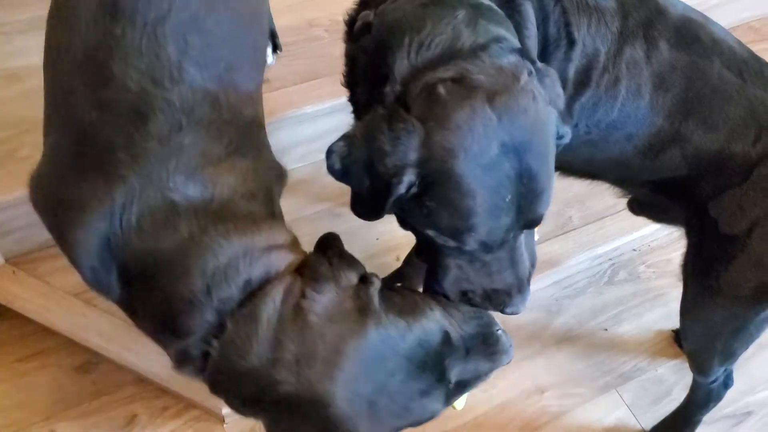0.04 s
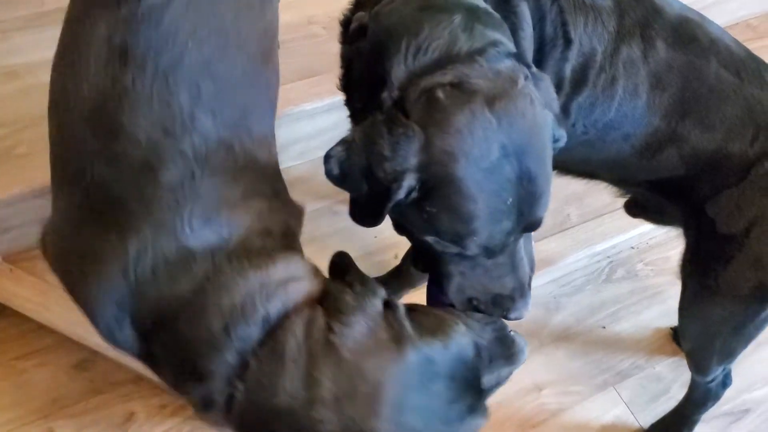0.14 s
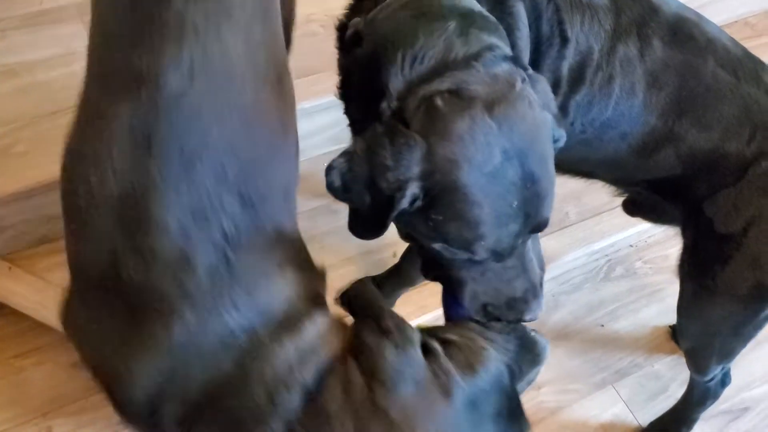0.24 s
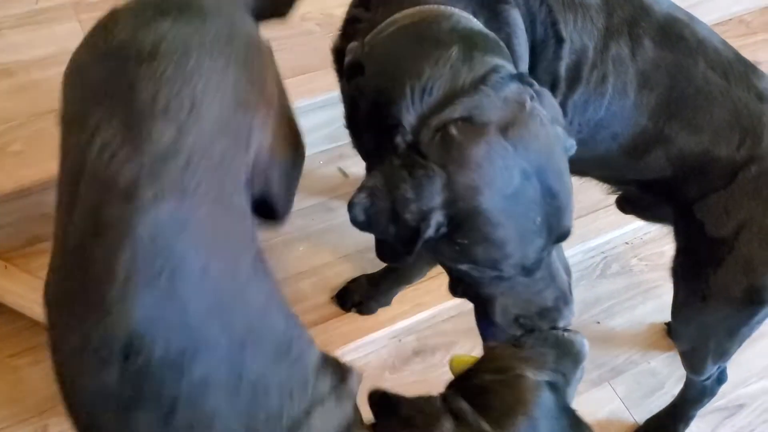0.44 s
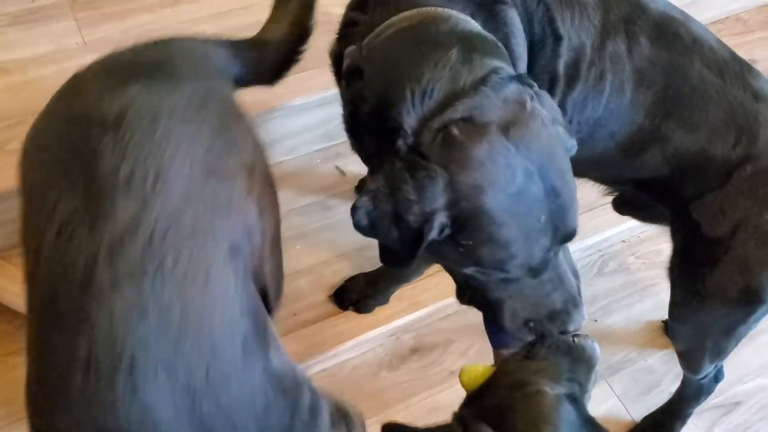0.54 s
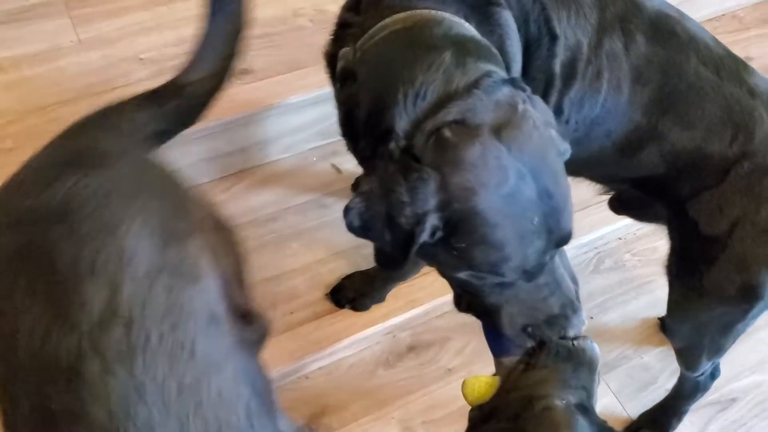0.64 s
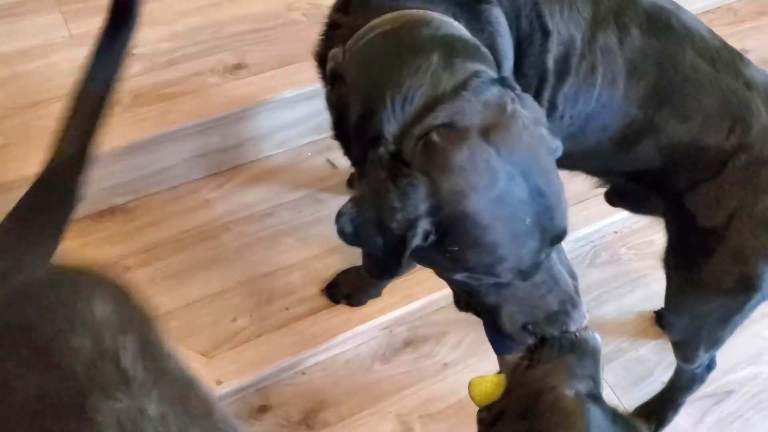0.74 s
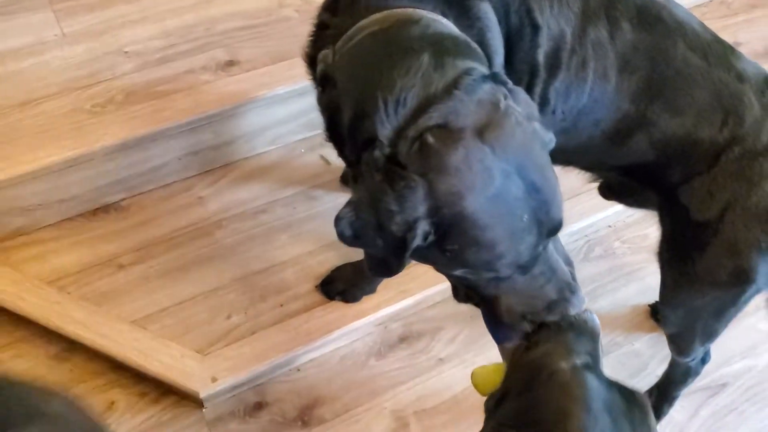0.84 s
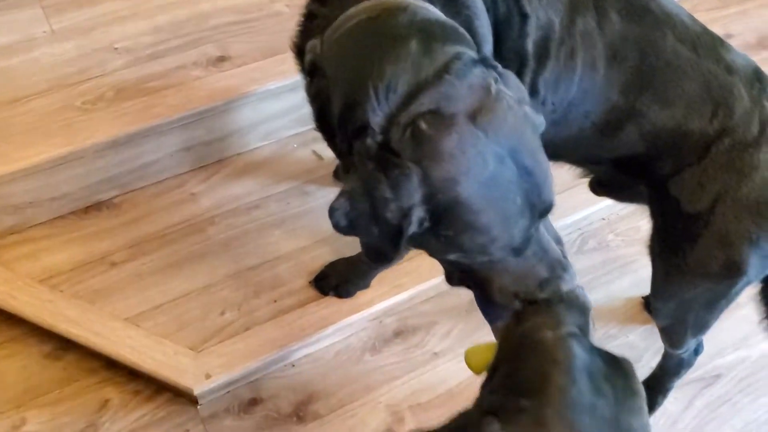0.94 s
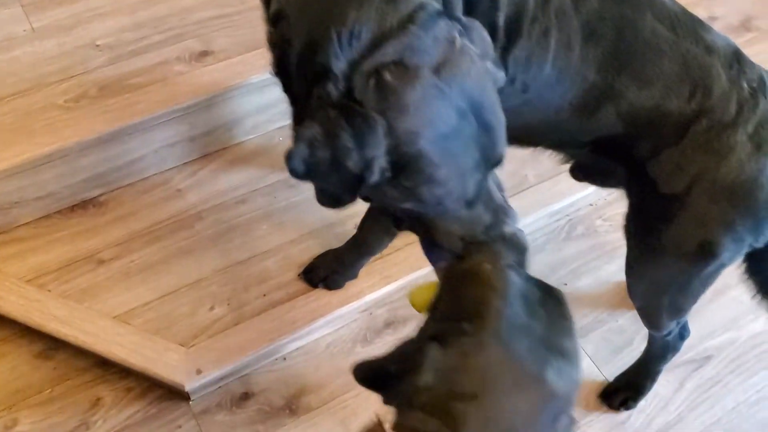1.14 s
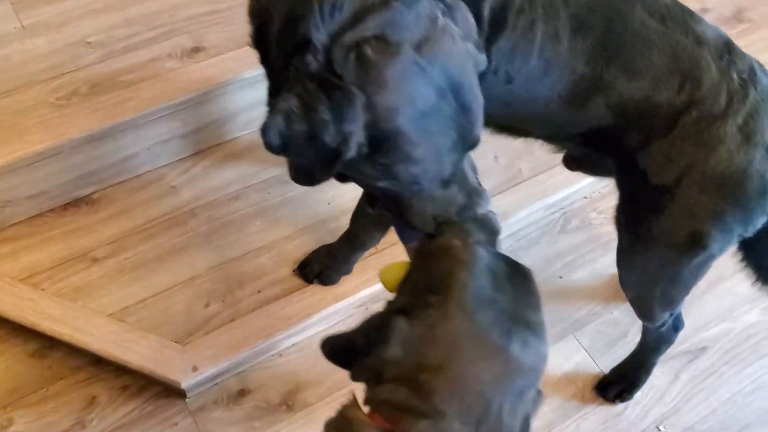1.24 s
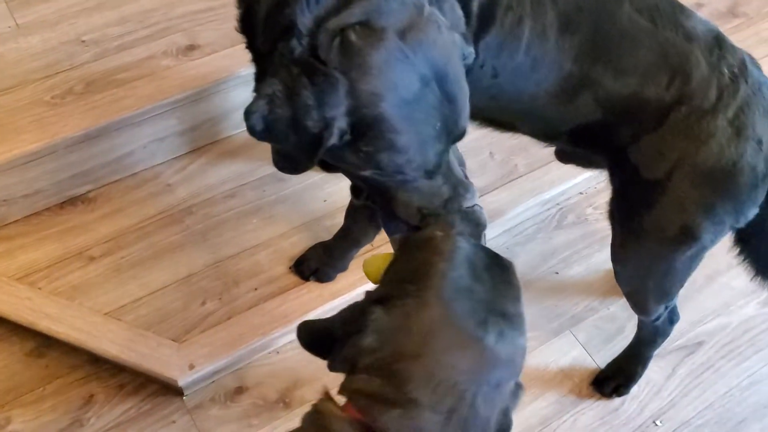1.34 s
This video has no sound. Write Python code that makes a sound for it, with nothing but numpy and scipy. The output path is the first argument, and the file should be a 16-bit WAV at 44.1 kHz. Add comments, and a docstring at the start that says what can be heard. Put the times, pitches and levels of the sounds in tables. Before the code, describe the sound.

Dog claws and paws scuffle on a wooden floor, close up indoors. Soft thuds, faint ticks and a brief scuff come around 0.2-0.3 s. Two loud, sharp claw clacks strike at 0.41 and 0.44 s, with low thumps until 0.52. A dense run of dull paw thuds follows at 0.7-0.9 s, then a lighter click at 0.98 and faint scuffs over low room hum.

```python
"""Dogs tugging at a toy on floorboards

Two large dogs tug at a toy on a wooden floor in a bare room, close to a pair of mic ports.
Claws rattle as bursts of clicks ringing board resonances; paws push the floor modes into a boom.
Pads and toy scuff in short hisses of shaped noise. The room adds a short tail of decaying noise
over a low hum of the house: rumble, faint hiss and a sine."""
import sys
import numpy as np
from scipy import signal
from scipy.fft import rfft, irfft, next_fast_len
from scipy.io import wavfile
from scipy.ndimage import uniform_filter1d

SR = 44100
rng = np.random.default_rng(int(sys.argv[2]) if len(sys.argv) > 2 else 0)


def generate_wav(sig):
    """Save sig (samples, or channels by samples) to the path in sys.argv[1] as 16-bit PCM at SR."""
    pcm = np.round(np.clip(np.atleast_2d(sig).T, -1, 1) * 32767).astype(np.int16)
    wavfile.write(sys.argv[1], SR, pcm)


N = 61739
T, M = np.arange(N) / SR, next_fast_len(2 * N, True)
F = np.maximum(np.fft.rfftfreq(M, 1 / SR), 1)

# claw strikes: t/s, level/dB, knock/dB, knock f/Hz, tick/dB, snap/dB, top/dB, rattle length/s
CLAW_STRIKES = [(0.108, -66, 12.5, 472, -19, -21, -16, 0.013),
                (0.158, -56, 7.5, 1454, -25, -36, -20, 0.0026), (0.195, -59, -8, 900, -8, -5, -16, 0.0036),
                (0.243, -56.5, 4.5, 520, 15.5, 7.5, -21, 0.0065),
                (0.2509, -49.5, 7, 1240, 14, 4.5, -9, 0.0043),
                (0.2684, -54, 7, 524, 14.5, -14, -23, 0.0066), (0.352, -55.5, -34, 920, -1, -8, -49, 0.021),
                (0.4084, -25.5, -6, 1028, 0.5, -3, -23.5, 0.011),
                (0.4443, -27, -2, 694, -1.5, -17.5, -31, 0.0044),
                (0.455, -44, 8.5, 880, 2.5, -11, -27, 0.0022),
                (0.591, -59, -3.5, 1180, 1, -1.5, -30.5, 0.017),
                (0.7146, -49.5, 13.5, 656, -24, -5.5, -13.5, 0.0017),
                (0.74, -55, 4.5, 697, -46, -32, -44, 0.033), (0.7886, -54, 9.5, 386, -6, -15, -25, 0.025),
                (0.9798, -37.5, -6, 800, 2.5, -5.5, -25.5, 0.017),
                (1.116, -66, 17.5, 890, -23, -17, -35, 0.0017),
                (1.149, -64.5, 17, 720, -17, -16, -54, 0.002)]
# board resonances under a claw, four tables from body to top: f/Hz, width/Hz, level/dB
BODY_MODES = [(1850, 526, 2), (2380, 103, 8), (2580, 1370, -9)]
TICK_MODES = [(3400, 695, 0.5), (3935, 277, 4.5), (4240, 325, -1)]
SNAP_MODES = [(5395, 420, 5.5), (7820, 2400, -7)]
TOP_MODES = [(9830, 480, 7), (12000, 2000, 3)]
# paw thuds: t/s, level/dB, contact time/s
PAW_THUDS = [(0.02, -54, 0.0091), (0.11, -49.5, 0.014), (0.201, -42, 0.0069), (0.2216, -47, 0.0062),
             (0.2334, -34.5, 0.0051), (0.261, -38, 0.016), (0.273, -38, 0.0052), (0.321, -51.5, 0.011),
             (0.429, -41.5, 0.0061), (.458, -31, 0.018), (0.496, -30.5, 0.017), (0.509, -32, 0.032),
             (0.637, -45.5, 0.01), (.685, -44, 0.0098), (0.714, -36, 0.0023), (0.722, -34.5, 0.0046),
             (.733, -28, 0.0067), (0.748, -32, 0.011), (.772, -29.5, 0.019), (0.787, -35, 0.013),
             (.805, -41, 0.0051), (0.821, -38, 0.00306), (0.835, -36, 0.0158), (.879, -38.5, 0.015),
             (1.021, -45, 0.0089), (1.045, -43.5, 0.0055), (1.071, -46, 0.015), (1.255, -66, 0.013),
             (1.293, -51.5, 0.014)]
# floor modes: f/Hz, level/dB, t60/s
FLOOR_MODES = [(43.9, 3.5, 0.13), (67, -1.5, 0.14), (120.8, -9, 0.15), (164.9, -2, 0.083), (219, -1, 0.033),
               (365, -12.5, 0.27), (508, -16.5, 0.058), (784, -10, 0.37)]
# scuffs of pads and toy: t/s, level/dB, rise/s, hold/s, fade t60/s, tilt/(dB per octave)
SCUFF_EVENTS = [(0.121, -45.5, 0.13, 0.017, 0.15, 0), (0.227, -39.5, 0.021, 0.0057, 0.075, 3),
                (0.588, -53.5, 0.046, 0.11, 0.14, -2), (0.706, -50.5, 0.0011, 0.023, 0.023, 2.5),
                (0.72, -56.5, 0.016, 0.091, 0.069, -3.5), (0.785, -51, 0.0019, 0.029, 0.094, 6),
                (0.797, -50.5, 0.0071, 0.028, 0.2, -5), (1.012, -53.5, 0.012, 0.017, 0.059, 5),
                (1.22, -55.5, 0.021, 0.0087, 0.33, 4.5)]
# scuff spectrum: f/Hz, density/(dB per Hz)
SCUFF_SPECTRUM = [(160, -30), (280, -8.5), (427, -1.5), (1180, -19.5), (1790, -11.5), (2350, -14),
                  (2970, -22.5), (6040, -24.5), (8320, -37), (10500, -31.5), (15800, -41)]
# decay time of the room: f/Hz, t60/s
ROOM_DECAY = [(100, 0.52), (500, 0.22), (800, 0.28), (1300, 0.32), (2000, 0.37), (5000, 0.32),
              (10000, 0.26), (16000, 0.25)]
# likeness of the room tail at the two ports: f/Hz, likeness/(0-1)
ROOM_PORT_LIKENESS = [(100, 0.95), (400, 1), (800, 0.22), (1500, 0.26), (8000, 0.4)]
# house noise spectrum: f/Hz, density/(dB per Hz)
HOUSE_SPECTRUM = [(15, -48), (25, 0), (133, -4), (248, -12.5), (557, -14), (710, -21.5), (834, -17.5),
                  (929, -26.5), (1360, -25.5), (1550, -28), (2090, -22.5), (2810, -35.5), (5980, -43),
                  (8730, -51), (15800, -40.5)]
# likeness of the house noise at the two ports: f/Hz, likeness/(0-1)
HOUSE_PORT_LIKENESS = [(100, 0.65), (400, 1), (1500, 0), (8000, 0.1)]
# colour difference of the ports: f/Hz, left minus right/dB
PORT_DIFFERENCE = [(60, 2.5), (110, -3.5), (200, 1), (380, -3.5), (700, -0.5), (1290, -2), (2380, -3),
                   (4400, -7.5), (8120, -1), (15000, 0)]

RATTLE_PER_S, RATTLE_SPREAD_DB = 4400, 3.5
RATTLE_RISE_S, TREBLE_RISE_S = 0.001, 0.0047
FIRST_CLICK_DB = 3.5  # before the rise is applied
KNOCK_WIDTH_HZ = 410  # of each of two cascaded resonances
REBOUND_AT_S, REBOUND_DB = 0.005978, -7.5  # time from strike start; level re first click
BOARD_DULL_HZ = 6500
SCUFF_GRIT_DB, SCUFF_SPREAD = 1.5, 1
ROOM_DB, SCUFF_ROOM_DB, FLOOR_ROOM_DB, ROOM_BUILD_S = -1, 3, -7.5, 0.0026
RIGHT_LATE_S, KNOCK_LATE_S, THUD_LATE_S = 0.000442, 0.00024, 0.00014
HOUSE_DB, HOUSE_WAVER_DB = -52, 1.2
HUM_HZ, HUM_DB = 103.4, -58.5
MIC_LOW_HZ, TOP_HZ = 35, 15900


def undb(db):
    """Amplitude ratio from dB."""
    return 10 ** (np.asarray(db) / 20)


def over_hz(table):
    """Interpolate a (f/Hz, value) table over log frequency."""
    hz, value = np.array(table).T
    return np.interp(np.log(F), np.log(hz), value)


def shape(x, gain):
    """Filter by a gain per frequency."""
    return irfft(rfft(x, M) * gain, M)[..., :N]


def unit(x):
    """Scale to RMS 1."""
    return x / np.sqrt(np.mean(x ** 2))


def peaks(table):
    """Summed band-pass resonances, alternating in sign."""
    total = 0
    for k, (hz, width_hz, db) in enumerate(table):
        damping = 1j * F * width_hz
        total = total + (-1) ** k * undb(db) * damping / (hz ** 2 - F ** 2 + damping)
    return total


def walk(rate_hz):
    """Smooth random wander, RMS 1."""
    k = int(SR / rate_hz)
    noise = rng.standard_normal(N)
    return unit(uniform_filter1d(uniform_filter1d(noise, k), k))


def pair(likeness):
    """Two noises, correlated by a share per frequency."""
    mid, side = rng.standard_normal((2, N))
    c = np.clip(likeness, 0, 1)
    mid = shape(mid, np.sqrt((1 + c) / 2))
    side = shape(side, np.sqrt((1 - c) / 2))
    return np.array([mid + side, mid - side])


def claw_clicks(length_s):
    """Five click trains of one strike: contact and rebound for the knock, four fading rattles."""
    span = 2000
    t = T[:span]
    chance, sign, size = rng.random((3, 5, span))
    size_db = -RATTLE_SPREAD_DB * np.log(size + 1e-6)
    clicks = (chance < RATTLE_PER_S / SR) * np.sign(sign - 0.5) * undb(size_db)
    clicks[0] = 0
    clicks[0, int(REBOUND_AT_S * SR)] = undb(FIRST_CLICK_DB + REBOUND_DB)
    clicks[:, int(RATTLE_RISE_S * SR)] = undb(FIRST_CLICK_DB)
    rise_s = np.array([[RATTLE_RISE_S]] + [[TREBLE_RISE_S]] * 3)
    clicks[1:] *= np.minimum(t / rise_s, 1) * np.exp(-(t / length_s) ** 4)
    energy = np.sum(clicks ** 2, axis=1, keepdims=True)
    return clicks / np.sqrt(energy / (length_s * SR))


def claws():
    """Claw strikes ring the boards; each resonance group gets its own click train."""
    drive, knocks = np.zeros((4, N)), np.zeros(N)
    for s, db, knock_db, knock_hz, tick_db, snap_db, top_db, length_s in CLAW_STRIKES:
        clicks = claw_clicks(length_s)
        group_db = np.array([[knock_db], [0], [tick_db], [snap_db], [top_db]])
        hit = np.zeros((5, N))
        start = int(s * SR)
        hit[:, start:start + clicks.shape[1]] = 5 * undb(db + group_db) * clicks
        knocks += shape(hit[0], 2 * peaks([(knock_hz, KNOCK_WIDTH_HZ, 0)]) ** 2)
        drive += hit[1:]
    dull = 1 / (1 + 1j * F / BOARD_DULL_HZ) ** 2
    boards = (dull * peaks(BODY_MODES), dull * peaks(TICK_MODES), dull * peaks(SNAP_MODES), peaks(TOP_MODES))
    ticks = sum(shape(d, board) for d, board in zip(drive, boards))
    return knocks, ticks


def thuds():
    """Each paw's soft push and rebound, lasting its contact time, sets the floor modes ringing."""
    push = np.zeros(N)
    for s, db, contact_s in PAW_THUDS:
        u = np.clip((T - s) / contact_s, 0, 1)
        push += undb(db) * np.sin(np.pi * u) * np.sin(2 * np.pi * u) / (contact_s * SR)
    ring = 0
    for hz, db, t60_s in FLOOR_MODES:
        ring = ring + undb(db) * np.sin(2 * np.pi * hz * T) * undb(-60 * T / t60_s)
    return 6 * shape(push, rfft(ring, M))


def scuffs():
    """Gritty friction hiss that swells, holds and fades, spread over some width of floor."""
    out = 0
    for s, db, rise_s, hold_s, t60_s, tilt_db in SCUFF_EVENTS:
        swell = np.clip((T - s) / rise_s, 0, 1) ** 2
        fade = undb(-60 * np.maximum(T - s - rise_s - hold_s, 0) / t60_s)
        mid, side = rng.standard_normal((2, N))
        wide = mid + SCUFF_SPREAD * side * np.array([[1], [-1]])
        grit = wide * undb(SCUFF_GRIT_DB * walk(220))
        colour_db = over_hz(SCUFF_SPECTRUM) + tilt_db * np.log2(F / 2000)
        hiss = unit(shape(grit, undb(colour_db) * (F > 280)))
        out = out + undb(db) * swell * fade * hiss
    return out


def room(x):
    """Diffuse reverberation: half-octave noise bands, each with its own decay, after a quick build-up."""
    noise, t60_s, tail = pair(over_hz(ROOM_PORT_LIKENESS)), over_hz(ROOM_DECAY), 0
    for hz in 40 * 2 ** np.arange(0, 9, 0.5):
        band = shape(noise, np.clip(1 - 2 * np.abs(np.log2(F / hz)), 0, 1))
        tail = tail + band * undb(-60 * T / t60_s[np.searchsorted(F, hz)])
    tail = tail * (1 - np.exp(-T / ROOM_BUILD_S)) / np.sqrt(0.027 * SR)
    return shape(x, rfft(tail, M))


def late(x, delay_s):
    """Delay the right port by a linear phase."""
    return shape(x, np.exp(-2j * np.pi * F * np.array([[0], [delay_s]])))


def house():
    """Low rumble and faint hiss as shaped noise, mains hum as a sine, all wavering a little."""
    noise = pair(over_hz(HOUSE_PORT_LIKENESS))
    air = undb(HOUSE_DB) * unit(shape(noise, undb(over_hz(HOUSE_SPECTRUM))))
    hum = undb(HUM_DB) * np.sqrt(2) * np.sin(2 * np.pi * HUM_HZ * T)
    return undb(HOUSE_WAVER_DB * walk(5.7)) * (air + hum)


def scene():
    """Sum direct sound with its port delays, room tail and house."""
    knocks, ticks = claws()
    soft = scuffs()
    low = thuds()
    send = undb(ROOM_DB) * (knocks + ticks) + undb(SCUFF_ROOM_DB) * soft + undb(FLOOR_ROOM_DB) * low
    heard = late(ticks + soft + room(send), RIGHT_LATE_S)
    heard = heard + late(knocks, KNOCK_LATE_S) + late(low, THUD_LATE_S)
    return heard + house()


def record(dry):
    """Two ports of different colour; the deepest bass and the top are cut."""
    half_split = np.array([[0.5], [-0.5]])
    ports = shape(dry, undb(over_hz(PORT_DIFFERENCE) * half_split))
    low_cut = signal.butter(4, MIC_LOW_HZ, "high", fs=SR, output="sos")
    top_cut = signal.ellip(10, 0.2, 80, TOP_HZ, fs=SR, output="sos")
    return signal.sosfilt(top_cut, signal.sosfilt(low_cut, ports))


dry = scene()
out = record(dry)
generate_wav(out)
```